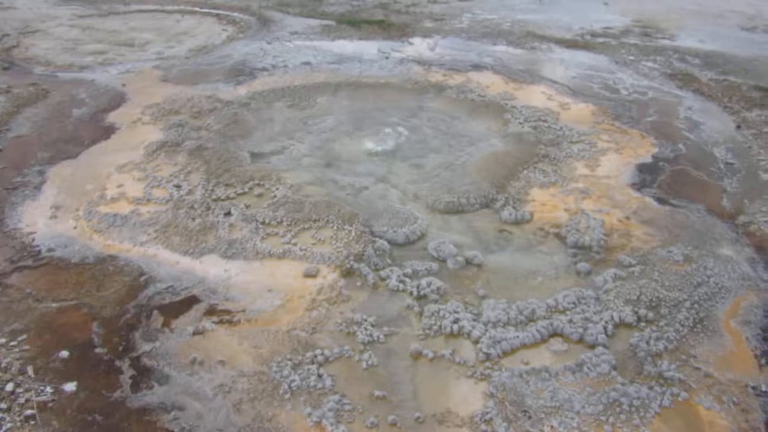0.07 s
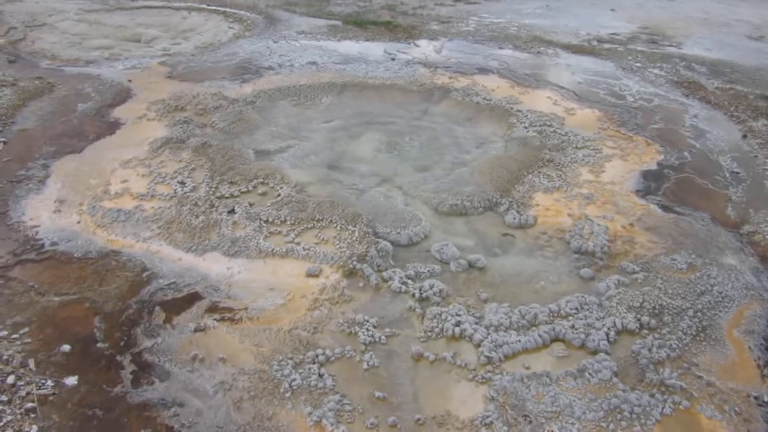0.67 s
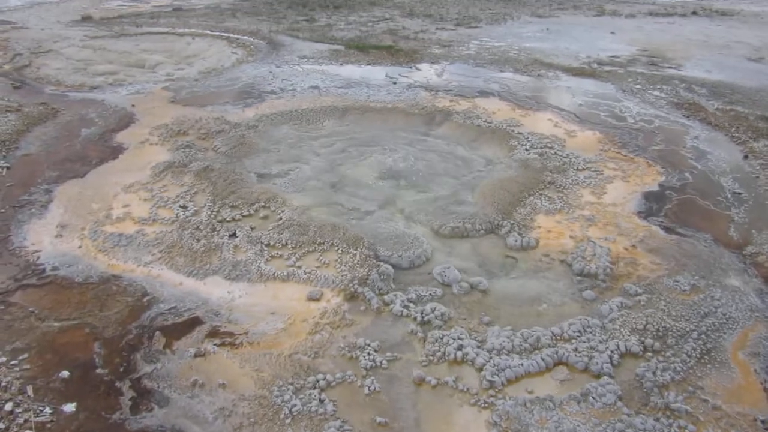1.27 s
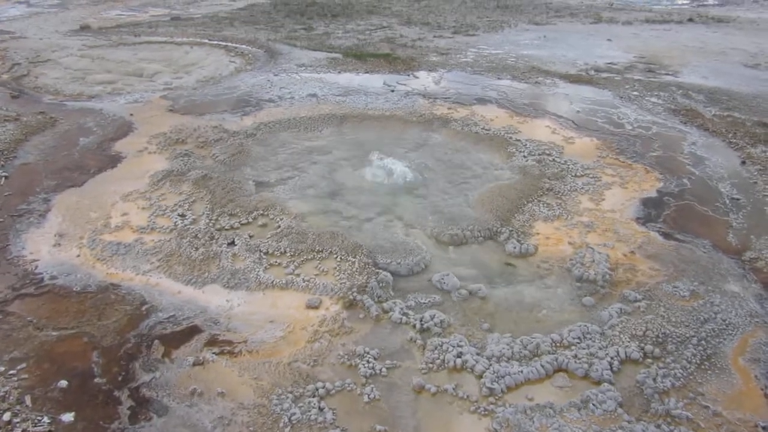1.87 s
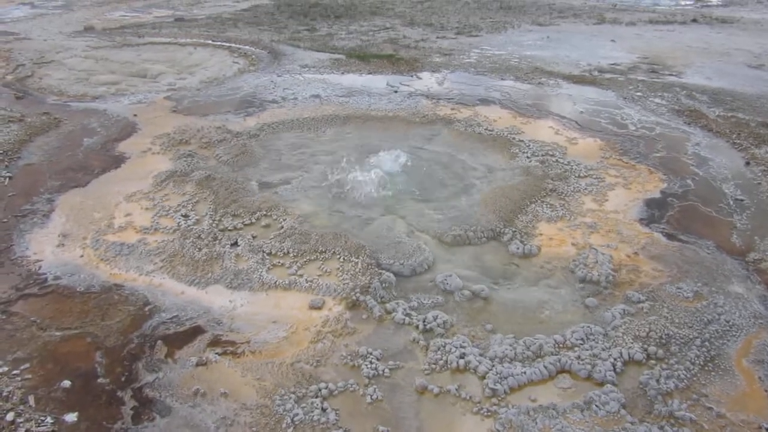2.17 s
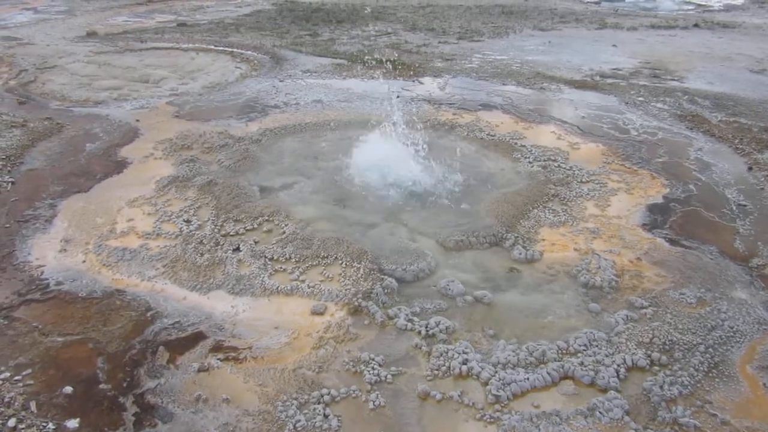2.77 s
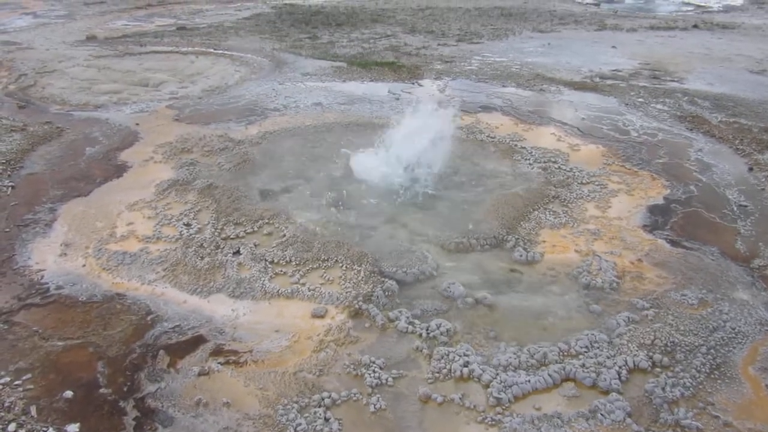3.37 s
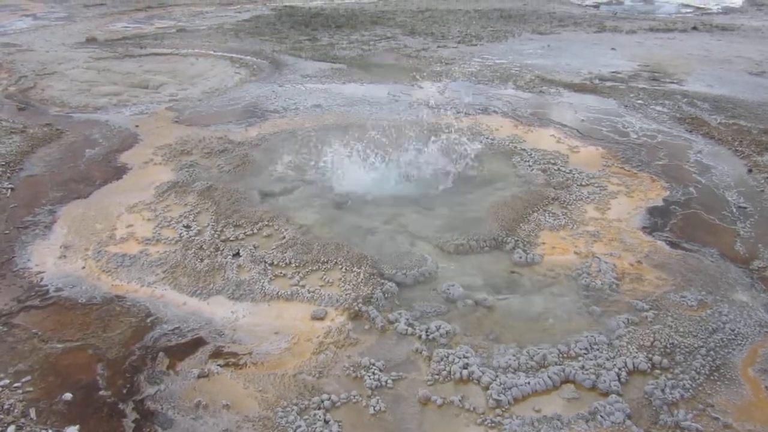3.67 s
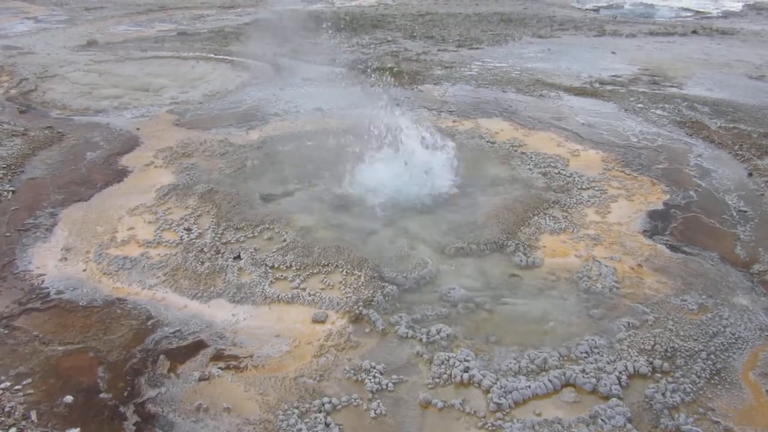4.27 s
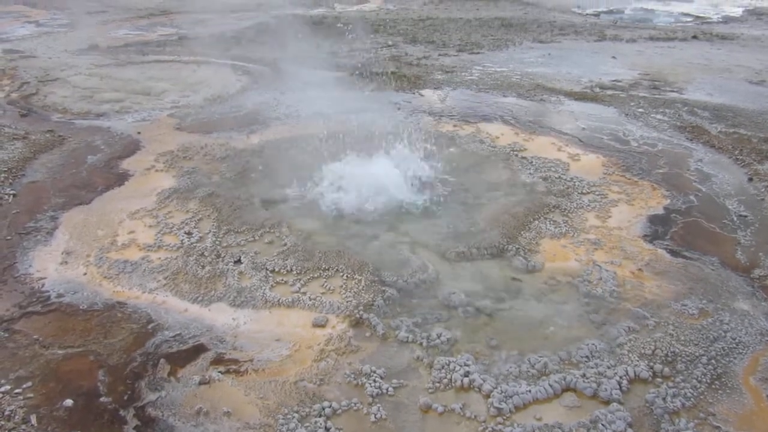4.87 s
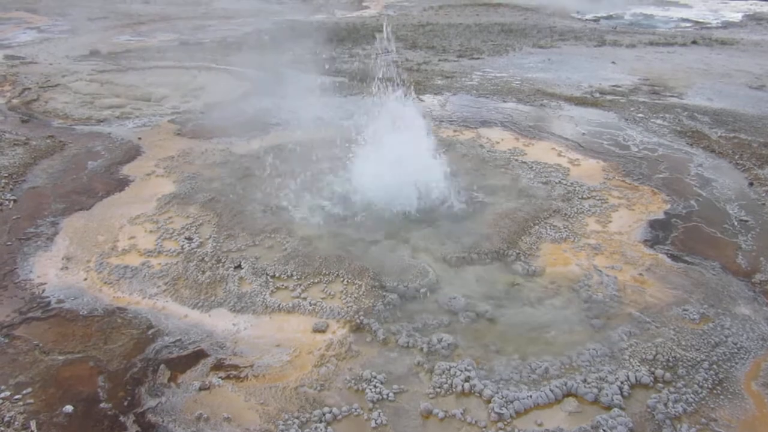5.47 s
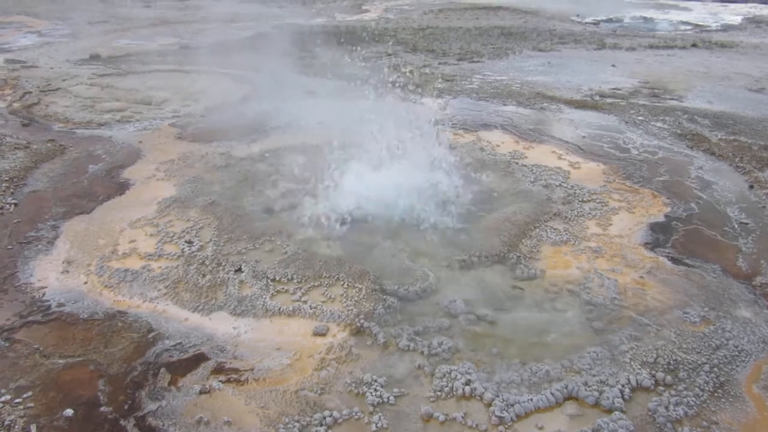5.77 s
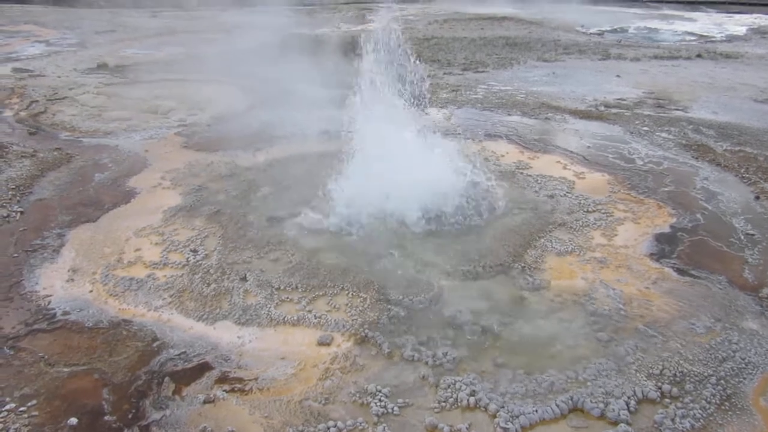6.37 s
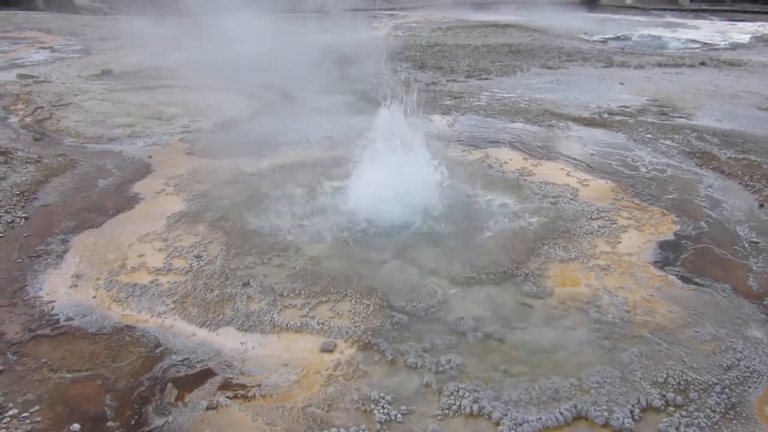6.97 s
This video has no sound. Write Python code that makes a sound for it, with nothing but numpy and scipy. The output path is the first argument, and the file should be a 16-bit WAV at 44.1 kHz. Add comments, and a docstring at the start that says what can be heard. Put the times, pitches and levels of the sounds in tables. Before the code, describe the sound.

Gusty wind buffets the microphone as a bubbling hot pool builds from soft splashes to heavier, hissing jets of water.

```python
"""A small geyser boils up in its outdoor pool, in surges that grow from soft splashing to tall jets.
The water tears and falls back as a dense patter with hissing spray, over the fizz of the pool.
Single drops smack and ring, and steam pockets burst hollowly through the surface.
Over a light breeze, gusts buffet the microphone with low thuds; the hardest make its limiter duck the water."""
import sys
import numpy as np
from scipy import signal
from scipy.fft import rfft, irfft
from scipy.io import wavfile
from scipy.ndimage import uniform_filter1d

SR = 44100
rng = np.random.default_rng(int(sys.argv[2]) if len(sys.argv) > 2 else 0)


def to_wav(s):
    """Save 16-bit WAV."""
    ch = np.atleast_2d(s).T  # columns
    pcm = np.round(np.clip(ch, -1, 1) * 32767)  # PCM
    wavfile.write(sys.argv[1], SR, pcm.astype(np.int16))


N = 317961
TIME = np.arange(N) / SR
START_S = .286   # silence before the sound opens


def from_db(db):
    """Decibels to gain."""
    return 10 ** (np.asarray(db) / 20)


def unit_rms(x):
    """Scale to an rms of 1."""
    return x / np.sqrt(np.mean(x ** 2) + 1e-20)


def automation(rows):
    """One curve per level column, drawn through the breakpoints at every sample."""
    times, *columns = np.transpose(rows)
    return [np.interp(TIME, times, column) for column in columns]


def eq_db(points, hz):
    """Read an EQ curve on a log-frequency axis."""
    point_hz, point_db = np.transpose(points)
    return np.interp(np.log(hz), np.log(point_hz), point_db)


def filtered(x, hz, kind, order=2):
    """Causal Butterworth filter."""
    sos = signal.butter(order, np.clip(hz, 10, .45 * SR), kind, fs=SR, output="sos")
    return signal.sosfilt(sos, x + 1e-18)


def drift(corner_hz):
    """Smooth random modulation with an rms of 1."""
    step, warm_up = 40, 2000
    pole = np.exp(-2 * np.pi * corner_hz * step / SR)
    noise = rng.standard_normal(N // step + warm_up + 2)
    slow = signal.lfilter([1], [1, -2 * pole, pole * pole], noise)[warm_up:]
    return np.interp(np.arange(N) / step, np.arange(len(slow)), unit_rms(slow))


def swells(rows, bed_db, attack_s, release_s):
    """Envelope in dB: a bed plus events (time [s], hold [s], level [dB]) that rise, hold and die away."""
    t = np.arange(0, TIME[-1], .001)
    power = np.zeros(len(t))
    for s, hold_s, db in rows:
        fade = np.maximum((s - t) / attack_s, 0) + np.maximum((t - s - hold_s) / release_s, 0)
        power += from_db(db) ** 2 * np.exp(-2 * np.minimum(fade, 20))
    return 10 * np.log10(from_db(bed_db) ** 2 + np.interp(TIME, t, power))


# The bed of falling water, building with the eruption: (time [s], splash level [dB], spray level [dB])
STEADY_FALL = [(.3, -51, -61), (.6, -60, -64.5), (.95, -59, -60.5), (1.35, -54.5, -58.5), (1.7, -52.5, -59),
               (1.9, -49, -54), (2.2, -50, -52), (2.45, -44, -54), (2.9, -36, -42), (3.2, -36.5, -39.5),
               (3.6, -40, -47), (4.0, -34, -38), (4.65, -31.5, -37), (5.28, -37, -42), (5.7, -32, -36),
               (6.1, -28.5, -35.5), (6.55, -35.5, -39), (7.2, -35.5, -41)]
# Surges thrown up from the vent: (time [s], hold [s], splash level [dB], spray level [dB])
VENT_SURGES = [(0.279, 0.11, -46.5, -50.5), (.402, 0.053, -38.5, -49), (0.467, 0.025, -53, -53),
               (1.055, 0.16, -48.5, -76), (1.184, 0.019, -42, -48.5), (1.48, 0.052, -61, -61),
               (1.792, 0.11, -45.5, -60), (1.993, 0.071, -38.5, -50), (2.322, .045, -36.5, -46.5),
               (2.495, .03, -34.5, -64), (2.533, 0.018, -32.5, -38), (2.66, 0.12, -41, -43.5),
               (3.334, 0.018, -34, -41.5), (3.704, 0.32, -35.5, -38.5), (4.464, .035, -29, -32.5),
               (4.7, 0.033, -33, -44), (4.945, 0.08, -31.5, -37.5), (5.396, 0.081, -32.5, -40),
               (5.79, 0.26, -36, -33.5), (6.028, 0.29, -36, -32.5), (6.122, 0.026, -31, -26),
               (6.617, 0.06, -40, -37.5), (6.824, .19, -35, -42)]
def surges(attack_s=0.025, release_s=0.044):
    """Splash and spray envelopes in dB: domes of water tear open and patter down over the steady fall."""
    splash_bed_db, spray_bed_db = automation(STEADY_FALL)
    s, hold_s, splash_db, spray_db = np.transpose(VENT_SURGES)
    return (swells(zip(s, hold_s, splash_db), splash_bed_db, attack_s, release_s),
            swells(zip(s, hold_s, spray_db), spray_bed_db, attack_s, release_s))


def impacts(per_s, spread_db=6.0):
    """Random clicks, many small and a few large, with the same mean power at any rate."""
    sizes = from_db(spread_db * np.minimum(rng.exponential(1, N), 4)) * rng.choice([-1, 1], N)
    hits = rng.random(N) < per_s / SR
    return unit_rms(sizes * hits / np.sqrt(per_s))


# Tone of the falling water: (frequency [Hz], gain [dB])
WATER_EQ = [(150, -14), (250, 9.5), (390, -8), (580, 6.5), (820, -1.5), (1100, 1.5), (2200, -3),
            (3100, -6.5), (4500, -8), (7000, -14.5), (9500, -19.5), (12000, -32), (15000, -28)]
def fountain(splash_db, spray_db, spray_lift_db=6.0, grain_share=0.57, flutter_db=1.5, patchy_db=0.37):
    """Droplets ring briefly at pitches set by their size, over the blur of countless smaller ones."""
    per_s = 1800 * from_db(.55 * (splash_db + 34.5))   # more water in the air, more impacts
    smacks = impacts(per_s / 2)                        # flat impacts sound in all bands at once
    clumps_db = flutter_db * drift(39)                 # the water comes down in clumps
    thrown = np.clip(per_s / 1500, 0, 1)               # a calm pool only bubbles; thrown water slaps
    edges = np.geomspace(140, 16000, num=21)
    out = np.zeros(N)
    for band, (low, high) in enumerate(zip(edges, edges[1:])):
        hz = np.sqrt(low * high)
        smack_share = 0.13 * thrown / (1 + (hz / 6000) ** 2)   # water is too soft to click at the top
        grain = np.sqrt(grain_share) * impacts(per_s * (hz / 4000) ** .5)
        slap = np.sqrt(smack_share) * smacks * (-1) ** band
        wash = np.sqrt(1 - grain_share - smack_share) * rng.standard_normal(N)
        spray_mix = np.clip(np.log(hz / 1600) / np.log(5500 / 1600), 0, 1)   # highs follow the spray
        envelope_db = (1 - spray_mix) * splash_db + spray_mix * (spray_db + spray_lift_db)
        band_db = envelope_db + eq_db(WATER_EQ, hz) + clumps_db + patchy_db * drift(20)
        out += from_db(band_db) * filtered(grain + slap + wash, [low, high], "band")
    return out * np.sqrt(SR / 2 / 1600)   # unity gain for a noise band 1600 Hz wide


# Tone of the simmering pool, a hollow body under an airy top: (frequency [Hz], gain [dB])
SIMMER_EQ = [(300, -5), (600, 16.5), (1000, 12), (2000, -45), (4000, -41), (6000, -5), (9000, -4),
             (12000, -8), (15000, -24)]
def simmer(level_db=-57):
    """The even fizz of the whole pool and its run-off."""
    hz = np.maximum(np.fft.rfftfreq(N, 1 / SR), 1)
    spectrum = rfft(rng.standard_normal(N)) * from_db(eq_db(SIMMER_EQ, hz))
    return from_db(level_db) * unit_rms(irfft(spectrum, N))


def turbulence(low_hz, high_hz, even_s):
    """Pressure noise with a steep top, levelled to an rms of 1 over windows of even_s."""
    lows = filtered(rng.standard_normal(N), high_hz, "low", order=4)
    noise = filtered(lows, low_hz, "high")
    return noise / np.sqrt(uniform_filter1d(noise ** 2, size=int(even_s * SR)) + 1e-12)


# The bed of breeze between the gusts: (time [s], rumble level [dB])
BREEZE_BED = [(.3, -45), (.95, -44), (1.4, -36), (2.4, -38), (3.1, -29.5), (3.5, -34.5), (4.05, -40),
              (4.35, -41), (4.6, -23), (5.2, -36), (6.3, -30), (6.7, -44), (7.2, -27)]
# Gusts buffeting the microphone: (time [s], hold [s], rumble level [dB], flap level [dB])
MIC_GUSTS = [(.345, .075, -24, -48), (0.443, .05, -15.5, -18), (0.493, 0.052, -21, -29.5),
             (0.817, 0.059, -25, -40.5), (1.098, 0.0092, -33, -58), (1.185, 0.047, -28, -57),
             (1.475, 0.13, -33, -67), (1.716, 0.087, -30.5, -51), (1.851, .005, -19, -29),
             (2.006, 0.076, -16, -19), (2.13, 0.18, -21, -34), (2.502, .085, -17, -22.5),
             (2.638, 0.13, -17, -24.5), (2.96, 0.094, -20, -23), (3.207, 0.16, -23.5, -37.5),
             (3.594, 0.15, -23, -37.5), (3.832, 0.063, -23.5, -44), (4.48, 0.043, -18.5, -18.5),
             (4.684, 0.035, -16.5, -28), (4.805, 0.005, -10, -19), (4.926, 0.06, -17.5, -29),
             (5.258, 0.029, -16, -31), (5.328, 0.014, -15, -20), (5.447, 0.077, -15.5, -27.5),
             (5.602, 0.05, -15.5, -22.5), (5.69, 0.15, -26.5, -30), (5.958, 0.038, -23, -36),
             (6.158, 0.017, -20, -37), (6.304, 0.028, -9, -14.5), (6.395, 0.059, -15, -16.5),
             (6.548, 0.016, -19.5, -36.5), (6.87, 0.085, -26, -38), (7.097, 0.096, -34, -33.5)]
def wind(attack_s=0.019, release_s=0.031, rumble_trim_db=-1.5, flap_trim_db=-1.0, lumpy_db=5.0):
    """Large eddies rumble on the microphone port; in strong gusts smaller ones flap at a higher pitch."""
    breeze_db, = automation(BREEZE_BED)
    s, hold_s, gust_db, gust_flap_db = np.transpose(MIC_GUSTS)
    rumble_db = swells(zip(s, hold_s, gust_db), breeze_db, attack_s, release_s)
    quicker = 2.15   # small eddies come and go faster
    flap_db = swells(zip(s, hold_s, gust_flap_db), breeze_db - 14, attack_s / quicker, release_s / quicker)
    rumble = from_db(rumble_db + rumble_trim_db) * turbulence(low_hz=40, high_hz=153.5, even_s=0.0344)
    flap = from_db(flap_db + flap_trim_db) * turbulence(low_hz=211, high_hz=334, even_s=0.0256)
    return from_db(lumpy_db * drift(37)) * (rumble + flap)


def drops(rows, trim_db=-2, ring_cycles=3.3, tick_db=-6, tick_s=0.00082, top_hz=8000):
    """Each drop lands with a sharp tick; its trapped bubble rings a few cycles and rises in pitch."""
    out, t = np.zeros(N), TIME[:SR // 20]
    for s, db, hz in rows:
        age = t * hz / ring_cycles
        bend = 1 + 0.0087 * np.minimum(age, 4)
        ring = np.sin(2 * np.pi * hz * t * bend) * np.exp(-age)
        noise = filtered(rng.standard_normal(len(t)), [hz / 2, max(top_hz, hz)], "band")
        tick = from_db(tick_db) * unit_rms(noise) * np.exp(-t / tick_s)
        at = round(s * SR)
        out[at:at + len(t)] += from_db(db + trim_db) * (ring + tick)[:N - at]
    return out


def stray_drops(splash_db, per_s=26, lift_db=8.5, spread_db=1.5, low_hz=1050, high_hz=4860):
    """Smaller drops land at random, riding the level of the splashing that throws them."""
    gap, size, pitch = rng.random((400, 3)).T
    s = START_S + np.cumsum(-np.log(1 - gap)) / per_s
    accent_db = spread_db * np.minimum(-np.log(1 - size), 3)
    db = np.interp(s, TIME, splash_db) + lift_db + accent_db
    hz = low_hz * (high_hz / low_hz) ** pitch
    return drops(np.transpose([s, db, hz])[s < TIME[-1]])


# Spot hits of the larger drops and bubbles: (time [s], level [dB], pitch [Hz])
DROP_HITS = [(.334, -27, 2480), (.402, -13, 1770), (.506, -29, 2160), (1.0, -34, 730), (1.054, -31, 1170),
             (1.111, -29.5, 6000), (1.209, -22.5, 5330), (1.347, -35, 3700), (1.595, -29, 5250),
             (1.775, -27.5, 3860), (1.945, -40, 8000), (2.154, -24, 4000), (2.312, -24, 2070),
             (2.349, -18, 6350), (2.526, -20, 5200), (2.559, -21, 2400), (2.716, -18, 1730),
             (2.791, -14.5, 4000), (3.359, -20, 2470), (3.414, -18.5, 3780), (3.709, -18, 3950),
             (3.969, -22, 4100), (3.997, -8, 3970), (4.065, -8.5, 5270), (4.108, -14, 6750),
             (4.172, -19, 8950), (4.711, -16, 2050), (4.869, -15, 3450), (5.166, -15.5, 4050),
             (5.793, -8.5, 1880), (5.808, -11, 1950), (6.271, -9, 4200), (6.309, -10, 4140),
             (7.098, -23, 3300)]
def large_drops():
    """Larger drops smack into the pool one by one."""
    return drops(DROP_HITS)


# Low thuds of single eddies hitting the microphone: (time [s], level [dB], pitch [Hz])
EDDY_THUDS = [(.437, -5, 175), (0.46, 6.5, 162), (0.494, 3, 191), (0.821, -11, 130), (0.877, -8, 177),
              (1.199, -16, 104), (1.855, -1, 208), (2, -1, 217), (2.009, 8.5, 158), (2.072, 6, 306),
              (2.105, -4, 283), (2.128, -7.5, 202), (2.254, -3, 80.4), (2.492, -1.5, 220), (2.557, 2, 112),
              (2.571, 2.5, 129), (2.682, 4, 244), (2.747, -3.5, 145), (3.02, -2, 190), (3.342, -4.5, 188),
              (4.15, -7.5, 282), (4.526, 0, 151), (4.682, -4.5, 110), (4.815, 10.5, 253),
              (5.001, -2.5, 136), (5.319, 1, 196), (5.337, 0.5, 240), (5.471, -10, 54), (5.626, -4, 127),
              (5.803, -1.5, 119), (6.313, 11.5, 189), (6.32, 1, 55), (6.401, 1, 120), (6.452, 12.5, 407)]
def eddies(trim_db=-3.5, rise_cycles=0.19, fall_cycles=0.36):
    """Each eddy pushes and pulls on the diaphragm for a cycle or two."""
    out, t = np.zeros(N), np.arange(-SR // 20, SR // 20) / SR
    width_cycles = np.where(t < 0, rise_cycles, fall_cycles)
    for (s, db, hz), sign in zip(EDDY_THUDS, rng.choice([-1, 1], len(EDDY_THUDS))):
        cycles = t * hz
        envelope = 1 / np.cosh(np.clip(cycles / width_cycles, -30, 30))
        at = round((s + t[0]) * SR)
        out[at:at + len(t)] += sign * from_db(db + trim_db) * envelope * np.cos(2 * np.pi * cycles)
    return out


# Hollow bursts of steam through the surface: (time [s], level [dB], resonance [Hz], half length [s])
STEAM_BURSTS = [(1.494, -41, 620, 0.0056), (1.789, -28.5, 520, 0.0047), (5.673, -23.5, 860, 0.005),
                (5.722, -17.5, 750, 0.026), (5.8, -23, 1880, 0.018)]
def steam_pockets(band_ratio=1.47):
    """Steam tears out of a cavity, which colours the burst with its broad resonance."""
    out = np.zeros(N)
    for s, db, hz, half_s in STEAM_BURSTS:
        rush = unit_rms(filtered(rng.standard_normal(N), [hz / band_ratio, hz * band_ratio], "band"))
        envelope = np.exp(-.5 * ((TIME - s) / half_s) ** 2)
        out += from_db(db) * rush * envelope
    return out


def limiter(x, threshold_db=1.5, release_db_per_s=50):
    """A loud thud pulls the gain down at once; the water then swells back."""
    over_db = np.maximum(20 * np.log10(np.abs(x) + 1e-9) - threshold_db, 0)
    recovery_db = release_db_per_s * TIME
    duck_db = np.maximum.accumulate(over_db + recovery_db, axis=-1) - recovery_db
    return x * from_db(-uniform_filter1d(duck_db, size=SR // 500))


def scene():
    """Mono mix: the geyser a few metres away, the wind right on the microphone."""
    splash_db, spray_db = surges()
    air = wind() + eddies()
    water = fountain(splash_db, spray_db) + simmer()
    accents = steam_pockets() + large_drops() + stray_drops(splash_db)
    return (water + accents + air)[None]


def record(dry):
    """The mix opens after a moment; the hardest thuds are limited and soft-clipped, the top is cut."""
    fade_in = np.clip((TIME - START_S) / .002, 0, 1)
    ducked = limiter(dry * fade_in)
    rounded = ducked / (1 + ducked ** 8) ** (1 / 8)
    high_cut = signal.ellip(12, .1, 90, 15100, fs=SR, output="sos")   # brick wall at 15.1 kHz
    return signal.sosfilt(high_cut, rounded)


dry = scene()
out = record(dry)
to_wav(out)
```